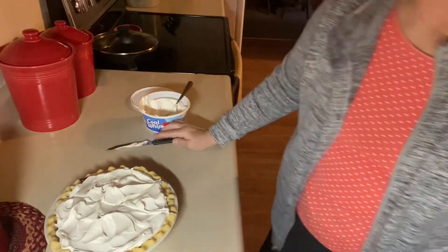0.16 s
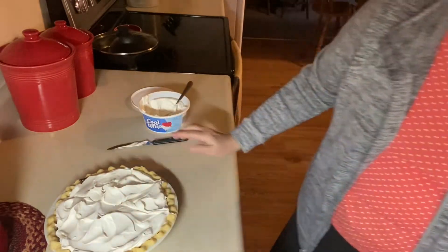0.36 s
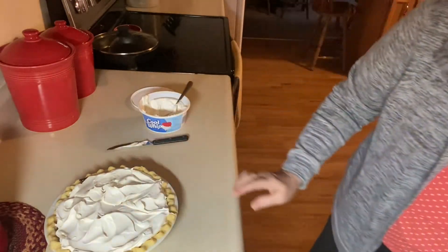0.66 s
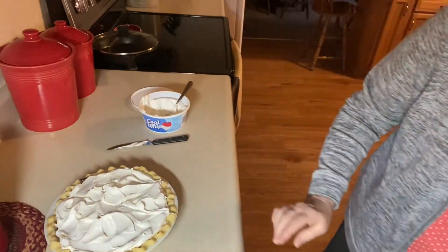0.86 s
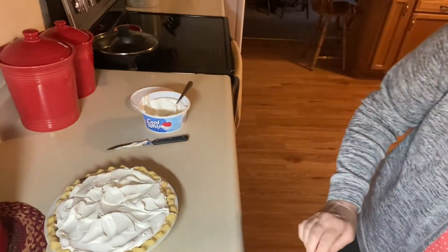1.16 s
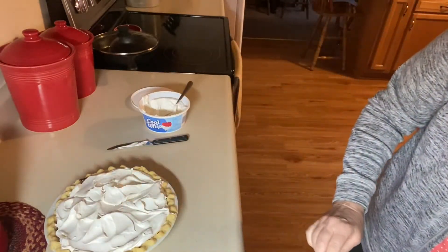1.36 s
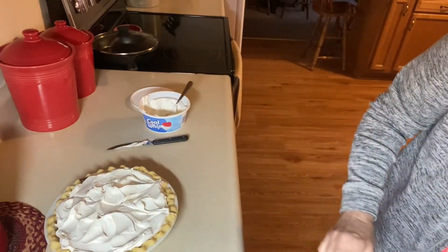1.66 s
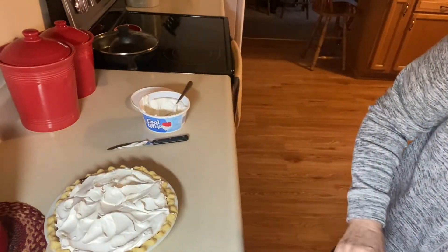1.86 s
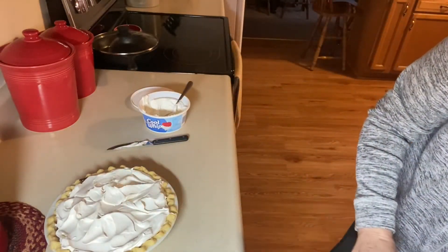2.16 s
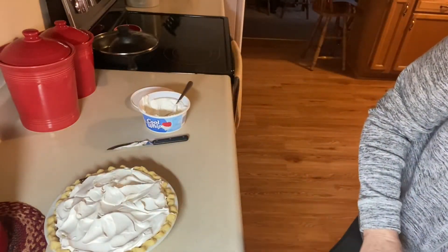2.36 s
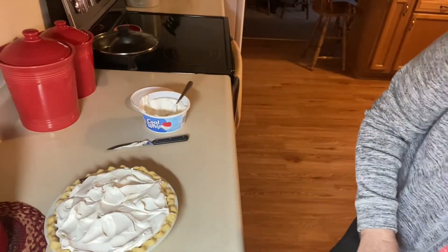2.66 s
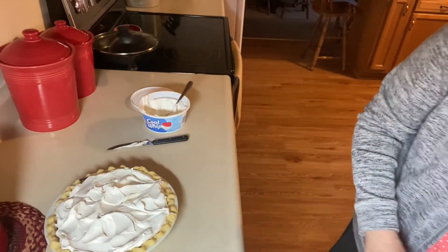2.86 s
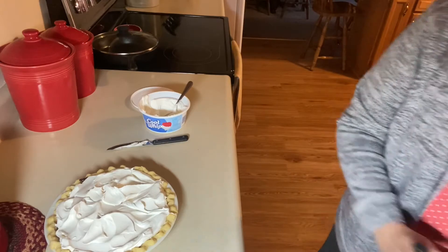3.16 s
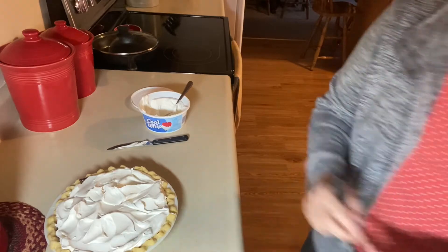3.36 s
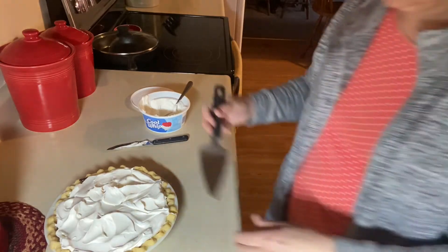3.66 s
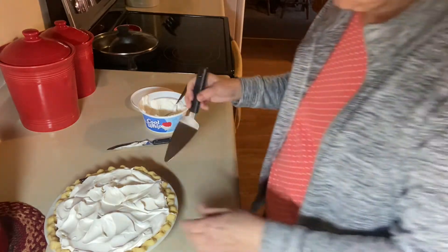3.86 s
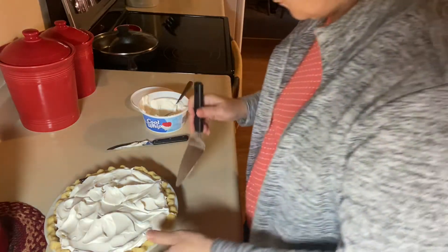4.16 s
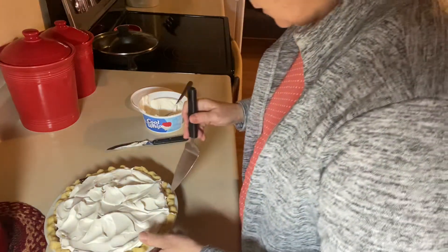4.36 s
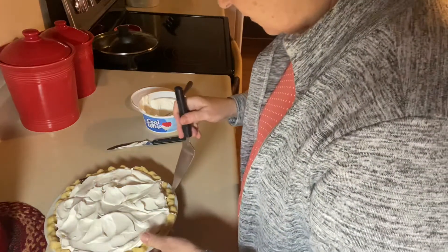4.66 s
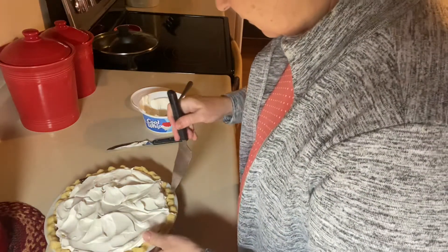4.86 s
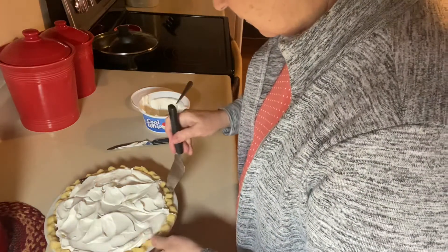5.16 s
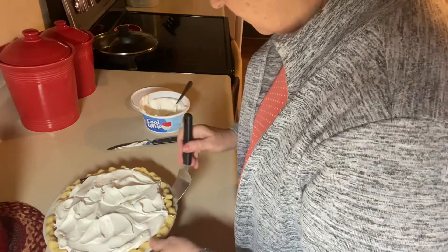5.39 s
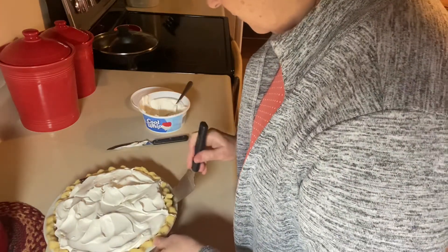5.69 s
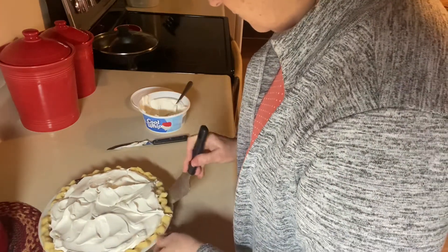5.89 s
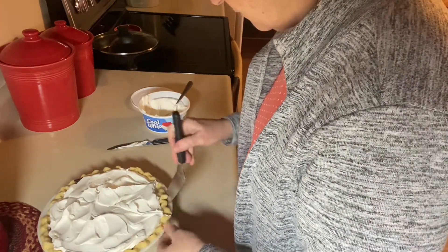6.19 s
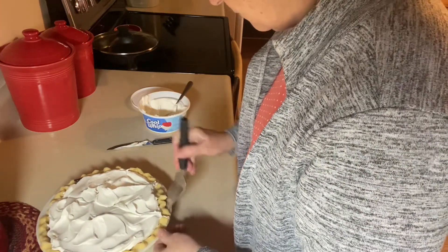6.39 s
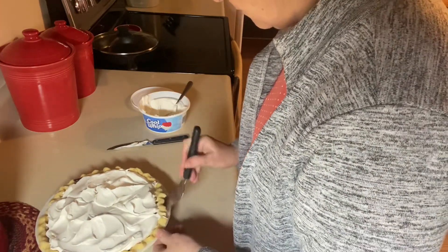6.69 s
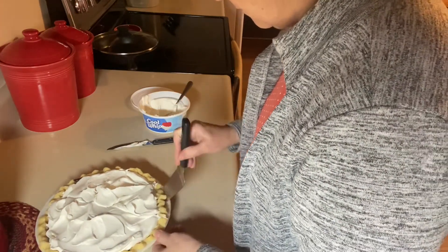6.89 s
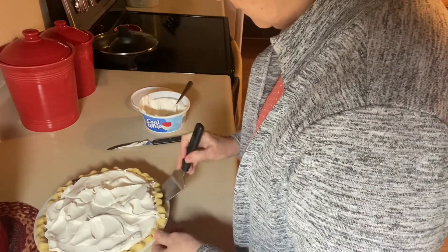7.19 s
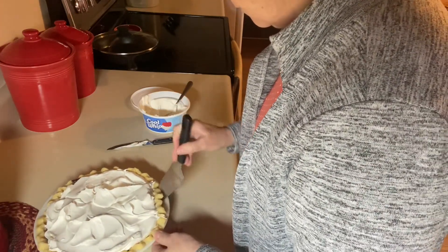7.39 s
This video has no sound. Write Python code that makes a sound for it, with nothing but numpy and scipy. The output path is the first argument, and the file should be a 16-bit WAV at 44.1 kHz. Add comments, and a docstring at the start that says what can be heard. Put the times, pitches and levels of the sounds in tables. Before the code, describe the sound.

A quiet kitchen, heard in stereo by a phone on the counter, with steady low fridge hum, bassy room air and short echoes. Right at 0 s a knife knocks down with a loud woody clack and a metallic clink, rocking to rest within a fraction of a second. From about 0.3 to 1.1 s a wooden drawer rumbles on its runners, its hollow boom sinking as it slows, with small knocks and clinks. Around 2.2-2.75 s cutlery is raked: quick rasps, rattles and wooden knocks. It quietens; faint sleeve rustles pass at 3.3-4.2 s. From 4.8 s to the end near 7.5 s, a steel server cuts crust: uneven bright ticks on ceramic, strongest near 5.2 s, short gritty scrapes, small crunches and faint rising chatter as the blade slides. Soft low thuds shake the counter, notably around 5.25, 7.1 and 7.45 s.

```python
"""A knife knocks down on wood in a quiet kitchen, a drawer rumbles open and cutlery is raked through;
sleeves rustle, then a steel pie server cuts crust, taps and scrapes a ceramic plate. A fridge hums throughout.
Knocks and taps are noise bursts and damped rings; scrapes and rumbles are dense random contacts, filtered or ringing.
Pushes on the server make the counter sway and thud. Hums are wavering sines; air and echo are shaped noise.
A phone standing on the counter hears it all through two ports, left and right."""
import sys
import numpy as np
from scipy import signal
from scipy.fft import rfft, irfft, next_fast_len
from scipy.io import wavfile
from scipy.ndimage import uniform_filter1d, map_coordinates

SR = 44100
rng = np.random.default_rng(int(sys.argv[2]) if len(sys.argv) > 2 else 0)


def generate_wav(sig):
    """Save sig (samples, or channels by samples) to the path in sys.argv[1] as 16-bit PCM at SR."""
    pcm = np.round(np.clip(np.atleast_2d(sig).T, -1, 1) * 32767).astype(np.int16)
    wavfile.write(sys.argv[1], SR, pcm)


N = 332514
T = np.arange(N) / SR  # time in seconds

# Ringing tones of the server blade, its thin edge and the plate: pitch_hz, level_db, t60_s (time to fade 60 dB)
STEEL_MODES = [(1700, -2, .02), (1950, 1, .02), (2130, 1, .018), (2430, -1, .02), (2950, -5, .025),
               (3380, -4, .025), (3700, 2, .018), (4030, 1, .018), (5170, -8, .025)]
EDGE_MODES = [(5670, 3, 0.022), (7100, 5, 0.0073), (7640, -1, 0.02), (8220, -4, 0.075), (8410, 4, 0.04),
              (11590, 3, 0.051)]
PLATE_MODES = [(407, 10, 0.038), (525.7, 8, 0.033), (677, -7, 0.054), (926, -2.5, 0.038),
               (1107, 2.5, 0.039)]
# Server striking the plate: start_s, level_db, edge_db and plate_db (both relative to level_db),
# blade_pitch_hz, edge_pitch_hz, plate_pitch_hz
TAPS = [(4.76, -64, -17, 19, 1700, 7640, 406), (4.9159, -32, -5.5, -12, 3680, 8610, 1110),
        (5.0278, -42, -17.5, -10.5, 3730, 8450, 515), (5.1776, -33, -15.5, -2, 3730, 8200, 530),
        (5.2207, -22, -3.5, -9, 4160, 6870, 530), (5.4377, -41, -27, -7, 1740, 7840, 397),
        (5.6092, -45.5, -31, -9, 2120, 7400, 416), (5.8369, -31.5, -6, -1, 2380, 11230, 1195),
        (5.937, -38, -14.5, -10, 1960, 6040, 543), (6.0767, -29.5, -9, -8, 2580, 8320, 1115),
        (6.331, -29.5, -8, -10.5, 4030, 8650, 433), (6.3494, -53, -1, 14.5, 1700, 7800, 492),
        (6.4268, -53.5, -26, 9, 1430, 6840, 960), (6.717, -44, -6, -30, 3750, 7200, 500),
        (6.7382, -38.5, -11, -22, 3620, 9270, 528), (6.773, -35.5, -15, -11, 2160, 6900, 950),
        (6.8523, -42, -26, -8, 2180, 8270, 540), (7.053, -28.5, -6, -12.5, 2277, 8860, 406),
        (7.0802, -29.5, -8, -7, 1990, 8400, 1146), (7.328, -26.5, -5.5, -7.5, 2100, 8100, 418),
        (7.431, -26.5, 2.5, -8.5, 1660, 11700, 353)]
FIRM_TAP_DB, LIGHT_TAP_DAMPING = -20, .2  # blade ring loses this many dB per dB below a firm tap
CRUNCH_DB, CRUNCH_S = -15.5, .0079  # crust crumbling: relative to the tap, decay time


def taps():
    """Each tap rings blade, edge and plate, with bright contact noise and crumbling crust."""
    s, db, edge_db, plate_db, steel_hz, edge_hz, plate_hz = np.transpose(TAPS)
    blade_db = db + LIGHT_TAP_DAMPING * (db - FIRM_TAP_DB)
    blade = blows(s, blade_db, STEEL_MODES, 2.5, .001516, .011, steel_hz, 6.4)
    blade = blade + band(cracks(s, db + 6, .0015), 1100, 2600)
    edge = blows(s, db + edge_db, EDGE_MODES, 1.1, .00037, .0046, edge_hz, 24)
    edge = edge + band(cracks(s, db + edge_db + 5.5, .0057), 5430, 12800)
    # the plate answers about 3 ms late, the crust 5 ms late
    plate = blows(s + .00307, db + plate_db, PLATE_MODES, .48, .0044, .0344, plate_hz, 6.1)
    crunch = band(cracks(s + .005, db + CRUNCH_DB, CRUNCH_S) * grit(2500, 2.5), 670, 5000)
    return blade + edge + plate + crunch


# Server dragged through crust and along the plate: full_pressure_s, rise_s, hold_s,
# then blade_db, edge_hiss_db, plate_db, all three before the mix gains in scrape()
DRAGS = [(4.849, 0.074, 0.045, -60, -64.5, -60), (4.895, 0.054, 0.0097, -45, -52.5, -57),
         (5.176, 0.041, 0.1, -48, -57, -55), (5.387, 0.062, 0.0087, -43.5, -60, -55.5),
         (5.741, 0.069, 0.13, -66, -72, -55), (6.121, 0.11, 0.024, -52.5, -60, -62),
         (6.305, 0.16, 0.14, -71, -69.5, -56.5), (6.613, 0.028, 0.17, -57.5, -60.5, -54),
         (6.981, 0.063, 0.21, -68, -70, -61), (7.318, 0.049, 0.097, -46, -58, -67),
         (7.457, 0.025, 0.0558, -53, -57, -57)]
DRAG_FALL_S = .075


def scrape():
    """Gritty contacts keep blade, edge and plate ringing, with hiss, while the pressure swells."""
    steel = .23 * unit(bend(ring(grit(2500, 3), STEEL_MODES), .014))
    edge = .47 * unit(bend(ring(grit(3000, 2), EDGE_MODES), .013))
    edge = edge + .7 * unit(band(grit(8000, 2), 4900, 12800))
    plate = 1.54 * unit(bend(ring(grit(3000, 8.9), PLATE_MODES), .0487))
    plate = plate + .5 * unit(band(grit(6960, 3.5), 730, 2200))
    at, rise, hold, *levels = np.transpose(DRAGS)
    parts = zip(levels, (steel, edge, plate))
    return sum(swell(at, rise, hold, DRAG_FALL_S, level) * part for level, part in parts)


# Blade sliding faster along the rim: full_pressure_s, hold_s, level_db,
# pitch_hz (at full pressure), climb_hz_per_s
STROKES = [(4.854, 0.047, -63.5, 1318, 15000), (5.743, .08, -62.5, 1099, 9000),
           (6.628, .15, -60.5, 1986, 13500)]
STROKE_RISE_S, STROKE_FALL_S = .04, .05


def strokes():
    """The blade's chatter climbs in pitch and rings the modes it passes."""
    slow = signal.lfilter([1], [1, -.975], grit(6200, 2.9))
    chatter = 0
    for start, hold, level_db, hz, climb in STROKES:
        pitch = hz + climb * np.clip(T - start, -STROKE_RISE_S, hold)
        tone = slow * np.sin(2 * np.pi * np.cumsum(pitch) / SR)
        chatter = chatter + unit(tone) * swell(start, STROKE_RISE_S, hold, STROKE_FALL_S, level_db)
    return chatter + undb(-28) * ring(chatter, STEEL_MODES + PLATE_MODES)


# Ringing tones of the wood: pitch_hz, level_db, t60_s
WOOD_MODES = [(380, -2, 0.064), (466, 5, 0.033), (710, 7.5, 0.03), (963, -1.5, 0.037), (1084, 3.5, 0.048)]
# Knife put down, cutlery and handles knocked: start_s, level_db,
# treble_db and wood_db (both relative to level_db), wood_pitch_hz
KNOCKS = [(0.0034, -24.5, -25, 4.5, 360), (0.0171, -10.5, -29.5, -19, 365), (0.0242, -27, -13.5, 4, 460),
          (0.413, -37.5, -17, -2.5, 420), (0.782, -40, -3.5, -7, 447), (0.8735, -30.5, -38, -1, 370),
          (1.0983, -34, -12, -28, 900), (2.2455, -44.5, 0, 6, 710), (2.266, -32.5, 3, -4.5, 440),
          (2.308, -29.5, -15.5, 8, 385.7), (2.334, -41, -31, 10.5, 370), (2.4017, -25.5, -2, -33.5, 900),
          (2.592, -22, -15.5, -12, 721), (2.609, -36, -29, 12.5, 370), (2.74, -38.5, -28, 5, 450),
          (4.145, -63, -31, 13.5, 840)]
# Tone of the knife settling: pitch_hz, level_db (relative)
SETTLE_TONE = [(40, -11.5), (400, -13), (1500, -0.5), (5000, -23.5), (15500, -50.5)]
SETTLE_DB, SETTLE_FALL_S = -24.5, .097  # start level, time to lose 20 dB


def knocks():
    """Knife and cutlery knock on ringing wood; the knife rocks to rest as fading grit."""
    s, db, treble_db, wood_db, wood_hz = np.transpose(KNOCKS)
    sharp = band(cracks(s, db - 9, .0086), 720, 4300)
    treble = band(cracks(s, db + treble_db, .0035), 7500, 19845)
    wood = blows(s, db + wood_db, WOOD_MODES, 2.7, .0025, .087, wood_hz, 9.3)
    settle = undb(SETTLE_DB - 20 * T / SETTLE_FALL_S) * colour(grit(6000, 2.5), SETTLE_TONE)
    return sharp + treble + wood + settle


# Knife blade and loose cutlery clinking: start_s, level_db, pitch_hz
CLINKS = [(.0162, -24, 4650), (0.301, -48.5, 2573), (0.559, -31.5, 1600), (0.721, -44, 2640),
          (.984, -35, 1640), (1.1, -63, 2935), (2.288, -30.5, 2437), (2.308, -41, 5020),
          (2.47, -44.5, 4850), (2.609, -64, 2384), (2.611, -37, 4050)]
CLINK_T60_S = .03


def clinks():
    """Each piece rings its own short note, rattled by a burst of tiny contacts."""
    return sum(blows([s], [db], [(hz, 0, CLINK_T60_S)], 0, .0065, 0) for s, db, hz in CLINKS)


def rattle():
    """Loose pieces jostled at random, each ringing its own note."""
    notes = np.transpose(CLINKS)[2]
    pieces = sum(ring(grit(20, 3), [(hz, 0, 2 * CLINK_T60_S)]) for hz in notes)
    return unit(bend(pieces, .03))


# Cutlery raked over the drawer floor: full_pressure_s, rise_s, hold_s, fall_s, rasp_db (before rattle), wood_db
RAKE = [(2.266, 0.0064, 0.016, 0.052, -53.5, -43), (2.305, 0.043, 0.014, 0.026, -40.5, -36.5),
        (2.458, 0.081, 0.072, 0.042, -36.5, -34), (2.593, 0.0093, 0.0026, 0.035, -29.5, -38.5),
        (2.619, 0.07, 0.071, 0.098, -43.5, -43)]
# Tone of the rasp: pitch_hz, level_db (relative)
RAKE_TONE = [(600, -25), (1100, -1), (2500, -9.5), (5500, -14), (8500, -10.5), (14000, -14), (15500, -12)]


def cutlery():
    """Raking makes a gritty rasp with rattling pieces, and scraping contacts ring the wood."""
    *shape, rasp_db, wood_db = np.transpose(RAKE)
    rasp = colour(grit(3500, .83), RAKE_TONE) + undb(-7) * rattle()
    wood = unit(bend(ring(grit(2000, 6.1), WOOD_MODES), .06))
    return swell(*shape, rasp_db) * rasp + swell(*shape, wood_db) * wood


# Drawer on its runners: time_s, rumble_db
DRAWER = [(.26, -54.5), (.41, -44), (.44, -37.5), (.57, -35.5), (.83, -40.5), (.88, -34.5), (.97, -42.5),
          (1.03, -48.5), (1.25, -64.5)]
# Tone of the rumble, then of the runner hiss: pitch_hz, level_db (relative)
DRAWER_TONE = [(90, -4.5), (140, -4), (430, -7.5), (700, -23), (1500, -24), (3000, -59.5)]
RUNNER_TONE = [(500, -25.5), (800, 1.5), (1500, 7), (2600, 3.5), (8000, -10.5), (14000, -21), (15500, -43)]
RUNNER_DB = -18  # hiss, relative to the rumble
# Pitch of the boom: time_s, pitch_hz
BOOM_PITCH = [(.3, 111.9), (.62, 111.1), (.8, 95.5), (.95, 69.5)]
BOOM_S, BOOM_RISE_S, BOOM_HOLD_S, BOOM_FALL_S = .345, .071, .66, .046
BOOM_DB, BOOM_SAG_DB_PER_S, BOOM_WAVER_TOP_HZ = -36, 17, 24


def drawer():
    """Runners judder the wooden box; its wavering boom sinks as it slows."""
    rumble = undb(np.interp(T, *np.transpose(DRAWER), left=-150, right=-150))
    hiss = undb(RUNNER_DB) * colour(grit(5000, 1.5), RUNNER_TONE)
    runners = colour(grit(2000, 2.2), DRAWER_TONE) + hiss
    pitch = np.interp(T, *np.transpose(BOOM_PITCH))
    waver = 1 + .42 * unit(band(rng.standard_normal(N), 2.2, BOOM_WAVER_TOP_HZ))
    boom = unit(waver * np.sin(2 * np.pi * np.cumsum(pitch) / SR))
    loudness = swell(BOOM_S, BOOM_RISE_S, BOOM_HOLD_S, BOOM_FALL_S, BOOM_DB)
    loudness = loudness * undb(-BOOM_SAG_DB_PER_S * (T - BOOM_S))
    return rumble * runners + loudness * boom


# Sleeves and hands moving: full_strength_s, rise_s, hold_s, dull_db, thin_db
RUSTLE = [(2.17, 0.067, 0.043, -77, -77), (3.385, 0.013, 0.013, -72, -65.5),
          (3.524, 0.0091, 0.016, -71, -102), (3.674, 0.19, 0.028, -84, -74.5),
          (3.853, 0.016, 0.066, -82, -61.5), (3.94, 0.065, 0.013, -64, -60.5),
          (3.317, .038, 0.03, -70, -79.5), (4.156, 0.017, 0.047, -65.5, -96.5)]
RUSTLE_FALL_S = .098


def sleeves():
    """Cloth rustles softly as dense grit in a dull band and a thin, high band."""
    *shape, dull_db, thin_db = np.transpose(RUSTLE)
    dull = unit(band(grit(11000, 1.1), 630, 2660))
    thin = unit(band(grit(7200, .22), 3500, 12000))
    return swell(*shape, RUSTLE_FALL_S, dull_db) * dull + swell(*shape, RUSTLE_FALL_S, thin_db) * thin


# Pushes that shake the counter under the phone: start_s, sway_db, thud_db (strength of the shove)
PUSHES = [(.02, -47, -40), (4.797, -51.5, -37.5), (5.256, -49, -25.5), (5.448, -56, -37),
          (5.884, -51.5, -49), (6.422, -52, -34.5), (7.122, -48.5, -32.5), (7.443, -40, -28)]
# Slow sway of the counter, then thud of its panel: pitch_hz, level_db, t60_s
COUNTER_MODES = [(51, 11.5, 1)]
THUD_MODES = [(99, -5.5, 0.21), (145, 0.5, 0.038)]


def counter():
    """Each push is one soft shove that sets the counter swaying and thuds its panel."""
    s, *levels = np.transpose(PUSHES)
    shove = np.zeros((2, N))
    shove[:, (s * SR).astype(int)] = undb(levels)
    sway, thud = uniform_filter1d(shove, size=150)  # each shove lasts about 3.4 ms
    return ring(sway, COUNTER_MODES) + ring(thud, THUD_MODES)


# Hums of the fridge: pitch_hz, width_hz (how fast each wanders), level_db
FRIDGE = [(60.5, 3.2, -52), (199.3, 1, -55), (222.2, 2.9, -59), (3030, 2.3, -88.5)]


def fridge():
    """Narrow wavering hums: sines whose size and phase wander."""
    out = 0
    for hz, width, db in FRIDGE:
        smoothing = np.exp(-np.pi * width / SR)
        drift = signal.lfilter([1], [1, -smoothing], rng.standard_normal((2, N)))
        wander = 4.2 + unit(drift[0]) + 1j * unit(drift[1])
        out = out + undb(db) * unit((wander * np.exp(2j * np.pi * hz * T)).real)
    return out


# Tone of the room air: pitch_hz, level_db (relative)
AIR_TONE = [(25, -36), (48, -13.5), (71, -15.5), (91, -21.5), (204, -15), (267, -22), (482, -27),
            (537, -35.5), (2770, -57.5), (3090, -64.5), (15500, -69)]
AIR_DB = -53.5


def room_air():
    """Steady room air: noise that is strongest in the bass."""
    return undb(AIR_DB) * colour(rng.standard_normal(N), AIR_TONE)


ROOM_T60_S, ROOM_DB = .3, -5.5  # echo fade time, echo gain
ROOM_DULL = .7  # extra fading of the treble, as a share of the main fading rate


def room(x):
    """Echoes blur into a noise tail, unrelated in the two ports, treble dying sooner."""
    t = np.arange(int(.5 * SR)) / SR
    noise = rng.standard_normal((2, len(t)))
    dull = signal.lfilter([.25], [1, -.75], noise)
    treble = (noise - dull) * .5 * undb(-60 * t * ROOM_DULL / ROOM_T60_S)
    tail = undb(-60 * t / ROOM_T60_S) * (dull + treble) * (t > .003)
    tail = tail / np.sqrt(np.sum(tail ** 2, axis=1, keepdims=True))
    return undb(ROOM_DB) * signal.fftconvolve(x[None], tail, axes=1)[:, :N]


# How far the left port leads the right, for server, plate, sleeves and background, then
# for knife, cutlery and drawer: pitch_hz, lead_radians
PORT_PHASE = [(0, 0), (250, 0), (480, 0.5), (1100, 1.5), (1700, -4.5), (4300, -5), (5500, -8), (6800, -7.5),
              (8800, -5.5), (12200, -0.94), (15300, -1)]
DRAWER_PHASE = [(0, 1), (500, -1.63), (1000, -2), (1800, -3.5), (4310, -8), (8700, -6), (12200, -0.74),
                (15300, 3.5)]
BASS_LEFT_DB, BASS_HZ = 3.5, 390  # how much more bass the left port hears, and up to about where


def ports(x, phase):
    """The two ports differ in phase, and the left one hears more bass."""
    size = next_fast_len(N + SR // 10)
    f = np.arange(size // 2 + 1) * SR / size
    half_gain = undb(BASS_LEFT_DB / 2 / (1 + (f / BASS_HZ) ** 4))
    lean = half_gain * np.exp(.5j * np.interp(f, *np.transpose(phase)))
    return irfft(rfft(x, size) * np.array([lean, 1 / lean]), size)[:, :N]


def undb(db):
    """Turn decibels into a plain gain."""
    return 10 ** (np.asarray(db) / 20)


def unit(x):
    """Scale to an average (rms) level of 1."""
    return x / np.sqrt(np.mean(x ** 2))


def colour(x, tone):
    """Shape the spectrum by a (pitch_hz, level_db) table, then scale to rms 1."""
    hz, db = np.transpose(tone)
    f = np.maximum(np.arange(N // 2 + 1) * SR / N, 1)
    gain = undb(np.interp(np.log(f), np.log(hz), db))
    return unit(irfft(rfft(x) * gain, N))


def band(x, lo_hz, hi_hz):
    """Gentle band-pass."""
    return signal.sosfilt(signal.butter(2, [lo_hz, hi_hz], "band", fs=SR, output="sos"), x)


def grit(rate, spread_db):
    """Dense contacts of uneven size (rate per second), in quick flurries."""
    hit = rng.random(N) < rate / SR
    flurry = unit(band(rng.standard_normal(N), 35, 130))
    return unit(hit * rng.standard_normal(N) * undb(spread_db * flurry))


def ring(force, modes):
    """Sum of damped modes driven by one force."""
    out = 0
    for hz, db, t60 in modes:
        r = np.exp(-np.log(1000) / (t60 * SR))
        w = 2 * np.pi * hz / SR
        out = out + undb(db) * signal.lfilter([0, np.sin(w)], [1, -2 * r * np.cos(w), r * r], force)
    return out


def blows(s, db, modes, scatter_db, chatter_s, detune, spot_hz=None, focus_db=0):
    """Each blow chatters; its modes are randomly detuned, and a given pitch sets and favours the nearest."""
    hz, mode_db, t60 = np.transpose(modes)[:, :, None]
    out, t = np.zeros(N + SR), np.arange(SR // 3) / SR
    for k, start in enumerate((np.asarray(s) * SR).astype(int)):
        scatter, shift = rng.standard_normal((2, len(modes), 1))
        octaves_off = 0 if spot_hz is None else np.abs(np.log2(hz / spot_hz[k]))
        gain = undb(db[k] + mode_db + scatter_db * scatter - focus_db * octaves_off - 60 * t / t60)
        tuned = hz * (1 + detune * shift)
        if spot_hz is not None:
            tuned[np.argmin(octaves_off)] = spot_hz[k]
        rings = np.sum(gain * np.sin(2 * np.pi * tuned * t), axis=0)
        chatter = rng.standard_normal(2000) * np.exp(-t[:2000] / chatter_s)
        chatter = chatter / np.linalg.norm(chatter)
        out[start:start + len(t)] += signal.fftconvolve(rings, chatter)[:len(t)]
    return out[:N]


def cracks(s, db, decay_s):
    """A broad, fading noise burst at each contact."""
    contact = np.zeros(N)
    contact[(np.asarray(s) * SR).astype(int)] = undb(db)
    return signal.lfilter([1], [1, -np.exp(-1 / (decay_s * SR))], contact) * rng.standard_normal(N)


def swell(s, rise_s, hold_s, fall_s, db):
    """Gain of gestures that gain 20 dB in the rise time, hold, and lose 20 dB in the fall time."""
    out = 0
    for start, rise, hold, fall, top in np.broadcast(s, rise_s, hold_s, fall_s, db):
        before = (start - T) / max(rise, 1 / SR)
        after = (T - start - hold) / max(fall, 1 / SR)
        out = out + undb(top - 20 * np.clip(np.maximum(before, after), 0, 10))
    return out


def bend(x, share):
    """Slow random bending of time makes the pitch wander by about this share."""
    drift = unit(band(rng.standard_normal(N), 1, 6))
    return map_coordinates(x, [np.arange(N) + share * np.cumsum(drift)], order=1, mode="mirror")


def scene():
    """Server, plate and sleeves, then knife, cutlery and drawer, heard directly and through the room."""
    serving = taps() + scrape() + strokes() + sleeves()
    unpacking = knocks() + clinks() + cutlery() + drawer()
    steady = counter() + fridge() + room_air()
    direct = ports(serving + steady, PORT_PHASE) + ports(unpacking, DRAWER_PHASE)
    # the room air is alike in both ports only in the bass
    apart = .94 * band(room_air(), 370, 14000) * np.array([[1], [-1]])
    # slow random time bending makes the echoes' pitches waver slightly
    echoes = room(band(serving + unpacking, 220, 10000))
    return direct + apart + np.array([bend(port, .01192) for port in echoes])


def record(dry):
    """The phone cuts deep bass and the very top."""
    bass_cut = signal.sosfilt(signal.butter(5, 35, "high", fs=SR, output="sos"), dry)
    return signal.sosfilt(signal.ellip(10, .2, 80, 15757, fs=SR, output="sos"), bass_cut)


dry = scene()
out = record(dry)
generate_wav(out)
```